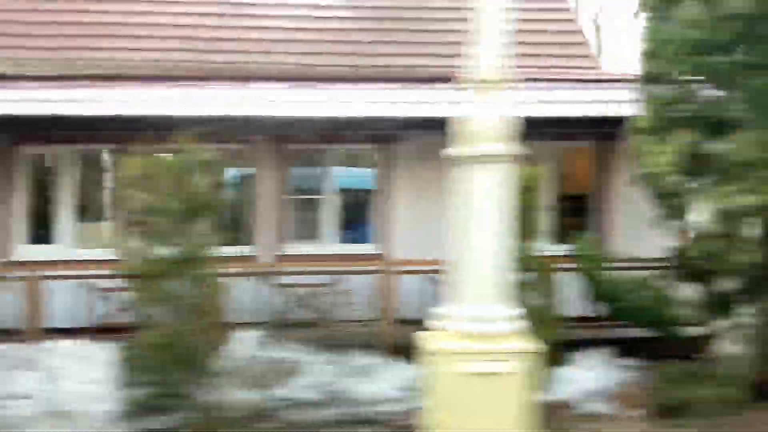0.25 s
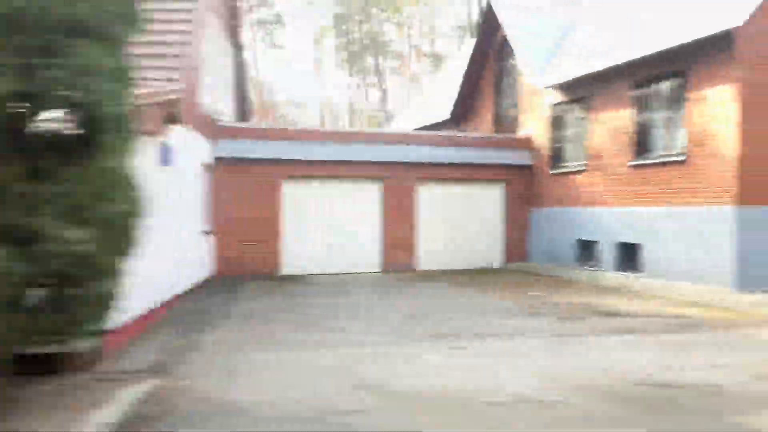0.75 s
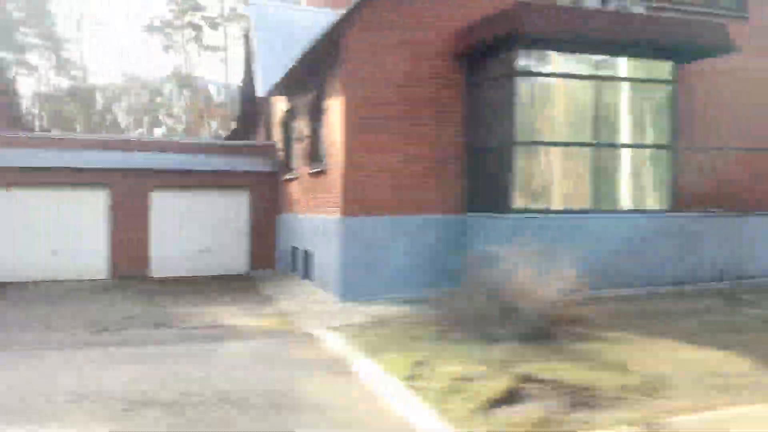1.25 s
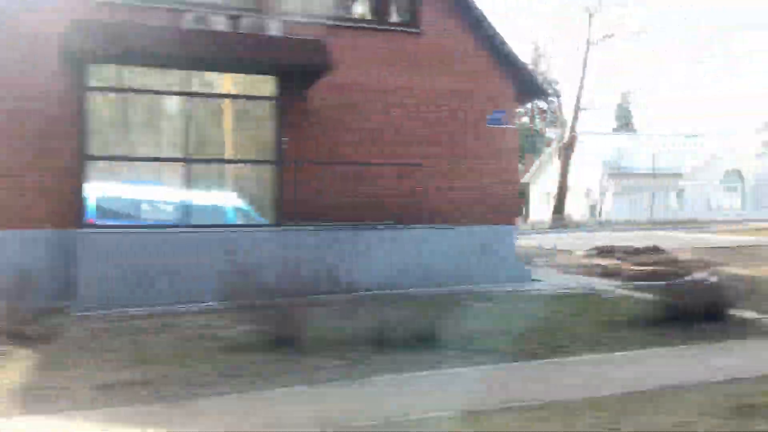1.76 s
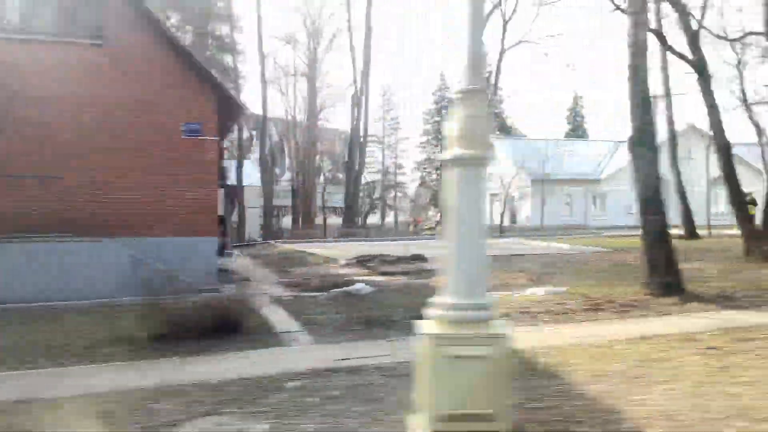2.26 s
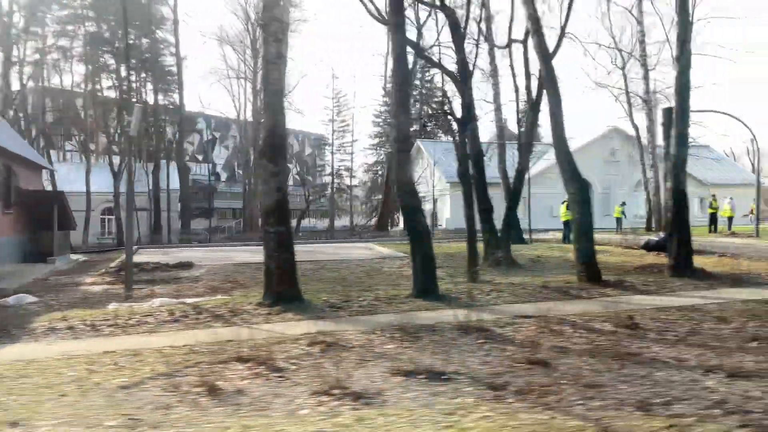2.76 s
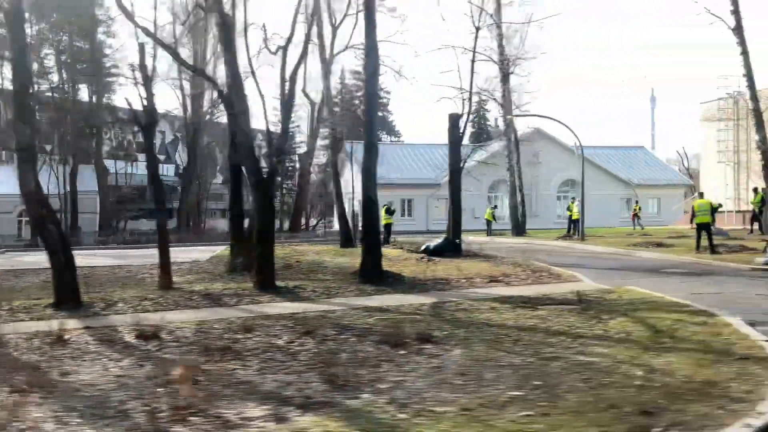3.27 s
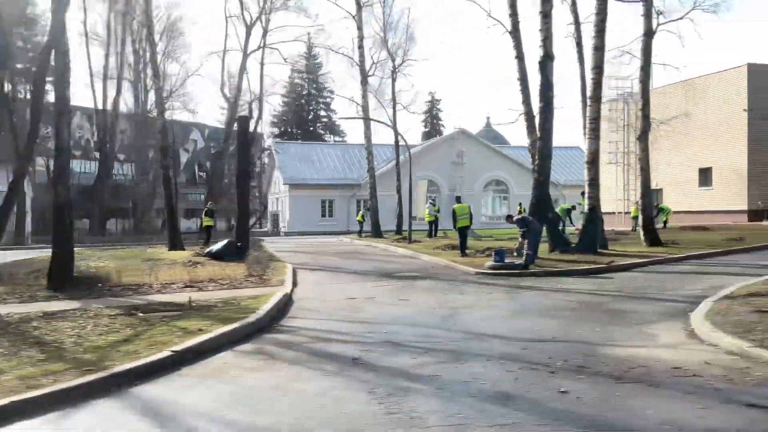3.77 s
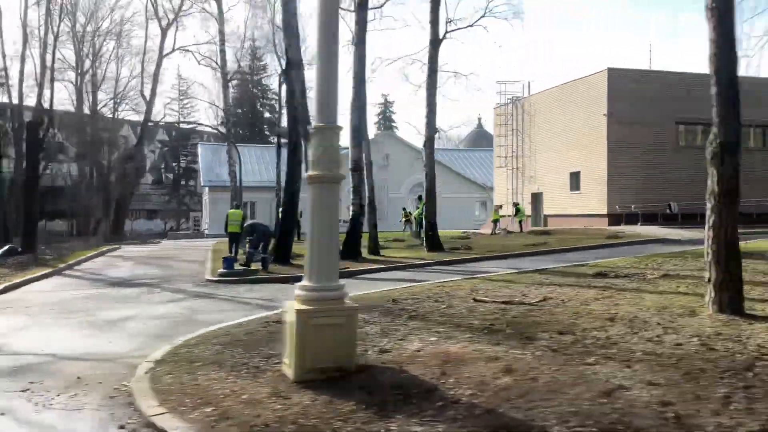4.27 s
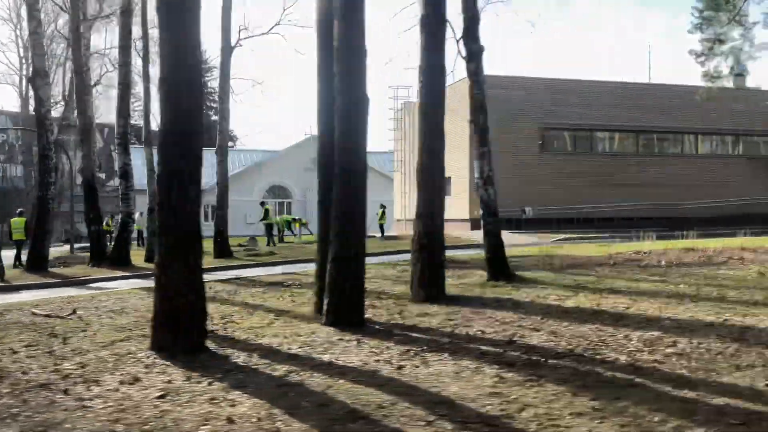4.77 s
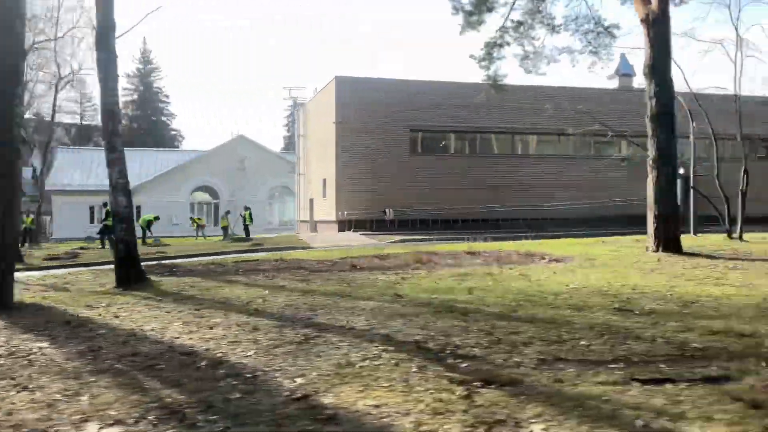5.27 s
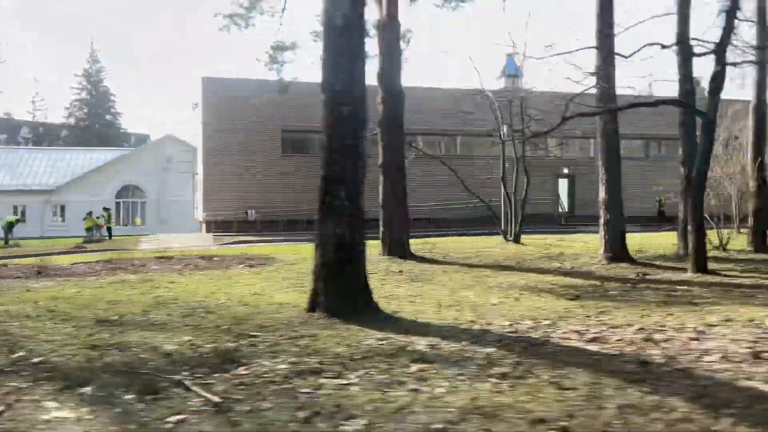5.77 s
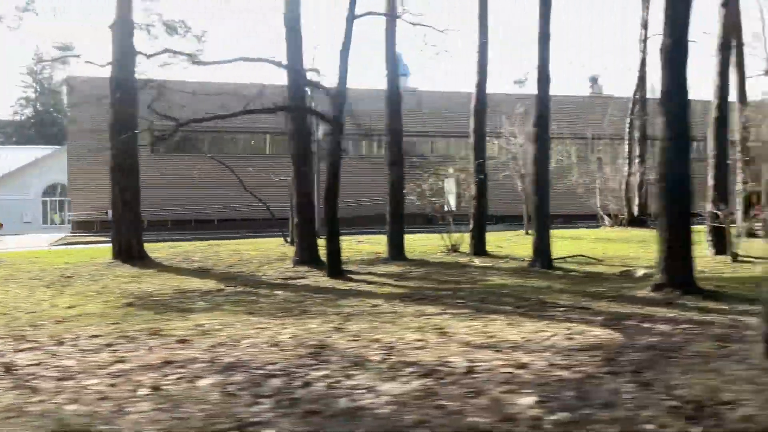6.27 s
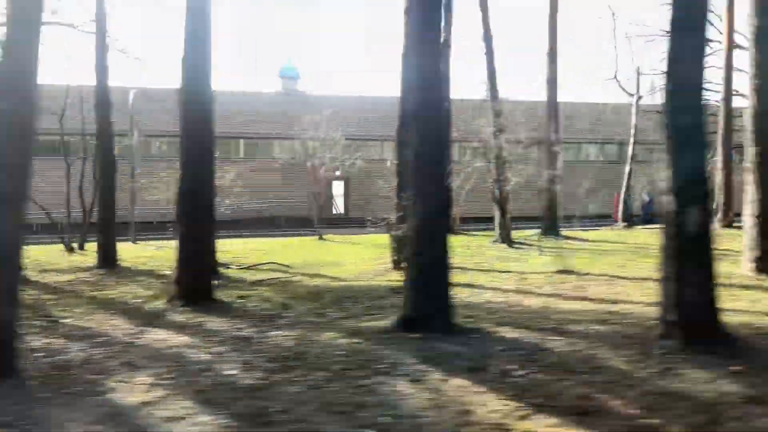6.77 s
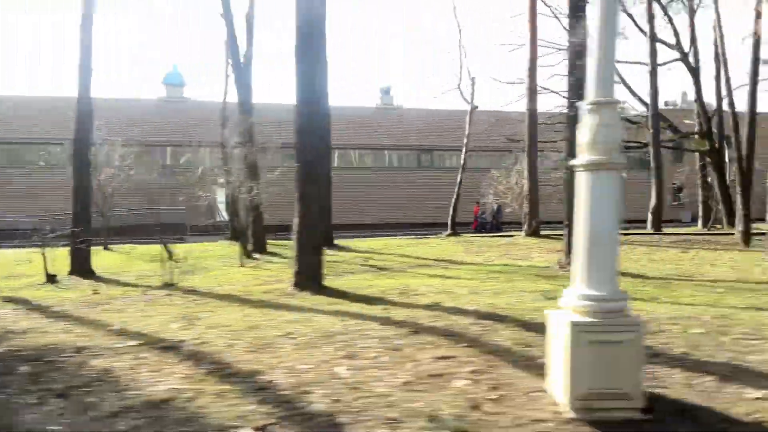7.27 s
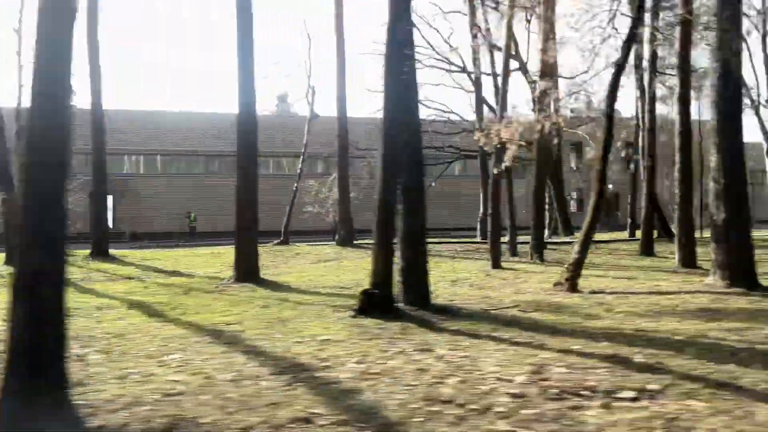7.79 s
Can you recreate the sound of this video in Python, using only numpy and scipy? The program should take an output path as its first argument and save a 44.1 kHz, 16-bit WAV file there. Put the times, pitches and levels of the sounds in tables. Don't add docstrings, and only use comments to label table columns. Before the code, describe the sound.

Heard by a phone near the window inside a slowing bus: a steady low engine drone with gear hum, boomy road rumble and dull panel roar. Light trim ticks and soft bumps come early; past the middle a rough patch brings thuds, rattling and hiss, peaking in one hard panel knock. A tiny metal buzz follows, then the engine eases off into quieter coasting.

```python
import sys
import numpy as np
from scipy import signal
from scipy.io import wavfile

SR = 44100
rng = np.random.default_rng(int(sys.argv[2]) if len(sys.argv) > 2 else 0)


def how_loud(loudness_db):
    steps = np.asarray(loudness_db, float) / 20
    return 10 ** steps


def int16_out(signal):
    q = np.round(np.clip(np.atleast_2d(signal).T, -1, 1) * 32767)
    wavfile.write(sys.argv[1], SR, q.astype(np.int16))


N = 354123
T = np.arange(N) / SR


def curve(table, t):
    s, *columns = np.transpose(table)
    return [np.interp(t, s, c) for c in columns]


def walk(rate, t, count=1):
    knots = rng.standard_normal((count, int(t[-1] * 60) + 3))
    place = np.clip(t * rate, 0, knots.shape[1] - 2)
    k = place.astype(int)
    ease = 0.5 - 0.5 * np.cos(np.pi * (place - k))
    return 1.05 * (knots[:, k] * (1 - ease) + knots[:, k + 1] * ease)


def stereo_noise(spectrum, ports, level_db, patchy_db, rate, panels=(), size=2048):
    overlap = size * 3 // 4
    hz, t, (a, b) = signal.stft(rng.standard_normal((2, N)), SR, nperseg=size, noverlap=overlap)
    log = np.log(np.maximum(hz, 1))

    def on_hz(table):
        table_hz, *columns = np.transpose(table)
        return [np.interp(log, np.log(table_hz), c) for c in columns]

    low, high = np.log([spectrum[0][0], spectrum[-1][0]])
    db = on_hz(spectrum)[0] - 60 * (np.maximum(low - log, 0) + np.maximum(log - high, 0))
    for f, width, lift_db in panels:
        db = db + lift_db / (1 + (2 * (hz - f) / width) ** 2)

    band = np.clip((log - np.log(20)) * 3 / np.log(2), 0, 31).astype(int)
    flicker_db = patchy_db * walk(rate, t, count=32)[band]
    grid_db = db[:, None] + np.interp(t, T, level_db) + flicker_db

    like, lead, pan_db = (c[:, None] for c in on_hz(ports))
    like = np.clip(like, 0, 1)
    right = like * np.exp(1j * lead) * a + np.sqrt(1 - like ** 2) * b
    pair = np.array([a * how_loud(pan_db / 2), right * how_loud(-pan_db / 2)])
    pair = pair * how_loud(grid_db) * np.sqrt(SR / 2)
    return signal.istft(pair, SR, nperseg=size, noverlap=overlap)[1][:, :N]


def ring(drive, hz, t60, lead=0.):
    pole = np.exp(2j * np.pi * hz / SR - np.log(1000) / (t60 * SR))
    z = signal.lfilter([1], [1, -pole], drive)
    return np.array([z.imag, (z * np.exp(1j * lead)).imag])


def band_pass(x, lo_hz, hi_hz):
    return signal.sosfilt(signal.butter(2, [lo_hz, hi_hz], "band", fs=SR, output="sos"), x)


def burst(chance, lo_hz, hi_hz, decay_s):
    puff = chance * np.exp(-T[:chance.shape[-1]] / max(decay_s, 1e-4))
    return band_pass(puff, lo_hz, hi_hz)


def add(out, s, sound):
    i = int(s * SR)
    out[:, i:i + sound.shape[1]] += sound[:, :N - i]


def drivetrain():
    # shaft_multiple, left_db, right_db, right_lead_rad
    engine_hum = [(2.022, -40, -41, 0.5), (3.06, -43.5, -48.5, -1.5), (6.974, -38.5, -55, 0),
                  (12.04, -43, -54, -1), (22.6, -62, -53.5, -3), (24.4, -58, -55, -2.5),
                  (25.8, -62.5, -59, -6), (29.4, -61.5, -58.5, -6)]
    # shaft_multiple, left_minus_right_db, right_lead_rad, right_pulling_db, right_coasting_db
    load_lines = [(3.983, 2, 1.1, -27, -39), (5.965, -5, .5, -32, -44.5), (15.99, -8, -1.76, -43, -56),
                  (7.977, 3.5, 2.0, -41.5, -37), (10.995, -4, -1, -27.5, -35.5),
                  (32.96, -10.5, -2.5, -65, -38.5)]
    # time_s, slack (0 pulling - 1 coasting)
    drive_slack = [(0, 0.34), (1.6, 0.016), (2.5, 0.13), (3.3, 0.47), (4.0, .4), (4.8, 0.27), (5.3, 0.45),
                   (5.55, 0.44), (6.1, 0.54), (7.2, 0.91), (8.03, 1.46)]
    shaft_hz, slowing_hz_per_s = 24.895, 0.226
    whine_full_slack = 0.53

    turns = np.cumsum(shaft_hz - slowing_hz_per_s * T) / SR
    t = T[::64]
    slack = curve(drive_slack, t)[0]
    whine_load = np.clip(slack / whine_full_slack, 0, 1) ** 2
    loads = [slack] * (len(load_lines) - 1) + [whine_load]

    lines = list(engine_hum)
    for (k, pan_db, lead, pull_db, coast_db), load in zip(load_lines, loads):
        db = pull_db + (coast_db - pull_db) * load
        lines.append((k, db + pan_db, db, lead))

    out = np.zeros((2, N))
    for k, left_db, right_db, lead in lines:
        swell, left, right, slip = walk(3.5, t, count=4)
        phase = 2 * np.pi * (k * turns + rng.random()) + np.interp(T, t, 0.39 * slip)
        left_amp = how_loud(left_db + 1.3 * swell + 1.5 * left)
        right_amp = how_loud(right_db + 1.2 * swell + 0.86 * right)
        out[0] += np.interp(T, t, left_amp) * np.sin(phase)
        out[1] += np.interp(T, t, right_amp) * np.sin(phase + lead)
    return np.sqrt(2) * out


def road_boom():
    # freq_hz, density_db_per_hz
    boom_colour = [(20, -71.5), (30, -49.5), (45, -48), (62, -41), (78, -44.5), (95, -40), (125, -46.5),
                   (160, -51.5), (230, -55.5), (290, -51.5), (330, -75.5), (400, -61)]
    # freq_hz, likeness (0-1), right_lead_rad, left_minus_right_db
    boom_ports = [(25, 1, 2.5, 0.5), (50, 0.8, 0, -5), (110, 0.56, -0.37, 1), (164, .62, 0.07, 2.5),
                  (236, 0.3, -1.7, -10.5), (298, .3, .5, -2), (440, .45, 4, -9)]
    # time_s, boom_db
    roughness = [(0, -20.5), (.25, -27.5), (.55, -23.5), (1.0, -22), (1.3, -22.5), (1.6, -25.5),
                 (2.3, -25.5), (2.7, -26), (3.7, -26.5), (4.2, -24.5), (4.7, -21.5), (5.0, -23),
                 (5.4, -18.5), (5.55, -23), (5.7, -27.5), (6.1, -27), (6.5, -30), (8.03, -27)]
    return stereo_noise(boom_colour, boom_ports, curve(roughness, T)[0] + 23, patchy_db=2.0, rate=3.02)


def panel_roar(shake_db):
    # freq_hz, density_db_per_hz
    roar_colour = [(300, -59), (380, -64), (520, -60.5), (700, -62), (780, -62), (860, -68.5),
                   (1000, -76.5), (1250, -78), (1900, -77), (2000, -82), (2900, -81.5), (3600, -90),
                   (4200, -94), (4800, -99)]
    # freq_hz, width_hz, lift_db
    panel_modes = [(434.3, 9.5, 11), (588, 11, 5), (679, 15, 7.5), (803, 11, 5), (1288, 31, 3.5),
                   (1618, 370, 5.5), (1594, 40, 3), (2197, 29, 5.5), (3057, 80, 6.5), (3462, 115, 11.5),
                   (3756, 120, 10), (4060, 90, 4)]
    # freq_hz, likeness (0-1), right_lead_rad, left_minus_right_db
    roar_ports = [(310, 0.53, 2.3, -6.5), (417, 0.28, 3.1, -6.5), (610, 0.79, 3.25, -7),
                  (778, 0.89, 3.6, -6.5), (923, 0.69, 3.0, -0.5), (1090, 0.22, 4.34, 0),
                  (1570, 0.74, 5.16, -7), (1790, 0.45, 5.2, -5.5), (2100, 0.1, 6.2, 1),
                  (2780, 0.25, 9.8, -4), (3190, 0.76, 10.9, 1.5), (3530, 0.59, 12.1, -6),
                  (3750, 0.68, 12.8, 1), (4330, 0.25, 12.5, -4)]
    # time_s, lasts_s, level_db, above_hz
    lull = (5, .5, -6, 2300)

    level_db = -1 - 0.3372 * T + 0.085 * shake_db
    roar = stereo_noise(roar_colour, roar_ports, level_db, patchy_db=0.73, rate=6.0,
                        panels=panel_modes, size=4096)
    s, lasts_s, db, hz = lull
    upper = signal.sosfiltfilt(signal.butter(1, hz, "high", fs=SR, output="sos"), roar)
    dip_db = db * np.exp(-((T - s) / lasts_s) ** 2)
    return roar + upper * (how_loud(dip_db) - 1)


def bumps():
    # time_s, peak_db, pitch_hz, cycles, left_minus_right_db
    wheel_bumps = [(1.058, -13, 90, 1.3, -9), (1.28, -12, 97.5, 5.6, -7), (1.439, -9.5, 96, 1.1, 1),
                   (4.93, -19.5, 45, 6, 1), (5.15, -16.5, 66, 6, -0.5), (4.831, -10, 97, 3.6, -5),
                   (4.88, -12.5, 92.8, 4, 1), (5.405, -15.5, 184.5, 5.5, 0), (5.449, -8, 84.6, 1.7, 4),
                   (5.497, -8, 80, 1.44, -2.5), (5.553, -28, 99, 1.6, 14), (6.079, -23, 90, 1.8, 4.5),
                   (7.179, -19.5, 91.5, 4.4, 3)]
    # time_s, peak_db, pitch_hz, cycles, left_minus_right_db
    seat_thud = (5.5, -23, 280, 2.6, 11)

    out = np.zeros((2, N))
    t = T[:SR // 5] - T[SR // 10]
    for s, db, hz, cycles, pan_db in [*wheel_bumps, seat_thud]:
        swing = np.exp(-(2 * hz * t / cycles) ** 2) * np.cos(2 * np.pi * hz * t)
        sides_db = db + np.array([[pan_db], [-pan_db]]) / 2
        add(out, s + t[0], how_loud(sides_db) * swing)
    return out


def panel_knock():
    # freq_hz, level_db, t60_s, right_lead_rad
    knock_modes = [(408, -8, .12, -2), (493, -1.5, 0.19, 5.5), (644, -10.5, 0.18, 3),
                   (836, -11.5, 0.12, 5.5), (1086, -15.5, 0.065, 3), (1454, -15.5, 0.14, 1),
                   (1890, -11.5, 0.055, 0.5), (2110, -13.5, 0.049, 1.5), (2541, -17, 0.026, -7.5)]
    knock_s, knock_db, crack_db, thump_db = 5.327, -22.5, -31.5, -30.5

    out, t = np.zeros((2, N)), T[:SR // 2]
    blow = rng.standard_normal(len(t)) * np.exp(-t / 0.011)
    modes = sum(how_loud(db) * ring(blow / 16, hz, t60, lead) for hz, db, t60, lead in knock_modes)
    add(out, knock_s, how_loud(knock_db) * modes)

    chance = rng.standard_normal((3, 3, len(t)))
    snap, body, tail = chance[:, :1] + 0.49 * chance[:, 1:]
    crack = 0.37 * burst(snap, 4000, 11500, 0.0012)
    crack = crack + 1.5 * burst(body, 980, 3600, 0.0098)
    crack = crack + 0.2 * burst(tail, 4300, 7000, 0.026)
    add(out, knock_s, how_loud(crack_db) * crack)

    thump_noise = body[::-1, ::-1] * [[1], [-0.5]]
    add(out, knock_s, how_loud(thump_db) * burst(thump_noise, 350, 1600, 0.03))
    return out


def metal_buzz():
    # freq_hz, level_db, t60_s
    metal_modes = [(4360, -1, 0.033), (4480, 5, .025), (5300, -2, .02), (6272, 0, 0.054), (6960, -2, .05),
                   (11400, -2, 0.066), (15160, -16, .03)]
    buzz_s, taps_per_s, buzz_db = 6.342, 93, -53.5

    out, taps = np.zeros((2, N)), np.zeros(SR // 2)
    chance = rng.standard_normal((5, 2))
    tap_s = np.abs(np.arange(5) + 0.1 * chance[:, 0]) / taps_per_s
    taps[(SR * tap_s).astype(int)] = how_loud(2.5 * chance[:, 1])
    modes = sum(how_loud(db) * ring(taps, hz, t60, hz / 5500) for hz, db, t60 in metal_modes)
    add(out, buzz_s, how_loud(buzz_db) * modes)
    return out


def trim_ticks():
    # start_s, peak_db, ring_hz, decay_s
    ticks = [(0.0932, -50.5, 5280, 0.03), (0.632, -51, 7500, 0.03), (0.8006, -51.5, 4890, 0.027),
             (0.9546, -42.5, 5400, 0.019), (2.3216, -56, 9440, 0.03), (3.2494, -51, 5590, 0.026),
             (4.0926, -49.5, 5450, 0.025), (4.144, -43, 5200, 0.026), (4.2967, -50, 5750, 0.03),
             (4.4738, -45, 4960, 0.034), (4.8282, -43, 5700, 0.027), (4.895, -50, 5100, .03),
             (5.374, -43, 5000, .03), (5.43, -45, 4300, .04), (4.995, -44, 6370, 0.028),
             (5.055, -48.5, 6970, 0.026), (5.1762, -45, 5500, 0.033), (5.4874, -45.5, 5810, 0.03),
             (5.5214, -38, 5570, 0.036), (5.7336, -53, 5280, 0.03), (7.2442, -49, 6590, 0.022),
             (7.5076, -46.5, 6640, 0.026)]
    out = np.zeros((2, N))
    for s, db, hz, decay_s in ticks:
        chance = rng.standard_normal((3, 2048))
        noise = chance[0] + 0.5 * chance[1:]
        add(out, s, how_loud(db + 4.0) * burst(noise, 0.77 * hz, 1.14 * hz, decay_s / 16))
    return out


def shaking():
    # time_s, hiss_lift_db, fall_s
    jolts = [(0.04, 6.5, .14), (.63, 9.5, 0.065), (.92, 5, 0.092), (1.16, 9.5, .2), (1.63, 12, .12),
             (2.18, 3.5, .04), (2.325, 7, 0.024), (3.25, 7.5, .06), (3.52, 5, 0.044), (3.8, 7, .12),
             (4.3, 7, .12), (4.47, 12, 0.13), (4.76, 16, .12), (4.96, 13.5, .1), (5.04, 15.5, .14),
             (5.24, 22, 0.09), (5.325, 25.5, 0.12), (5.42, 22, 0.11), (5.55, 11, 0.058),
             (5.74, 13.5, 0.094), (5.98, 16.5, .05), (6.16, 16, .05), (6.355, 17.5, .04), (6.55, 9, .04),
             (6.78, 10, 0.16), (7.08, 13.5, .06), (7.25, 9, .025), (7.51, 16, 0.036), (7.685, 7.5, .025),
             (7.87, 9, 0.05)]
    rise_s = 0.032
    t, power = T[::64], 1
    for s, db, fall_s in jolts:
        slope_s = np.where(t < s, rise_s, fall_s)
        power = power + how_loud(2 * db) * np.exp(-np.abs(t - s) / slope_s * 2)
    return np.interp(T, t, 10 * np.log10(power))


def chatter(shake_db):
    hit, size = rng.random((2, N))
    clicks_per_s = 12 * how_loud(1.2 * shake_db)
    click_db = -54.5 + 0.29 * shake_db - 11 * size
    clicks = (hit < clicks_per_s / SR) * how_loud(click_db)
    noise = rng.standard_normal((3, N))
    noise = noise[0] + 0.6 * noise[1:]

    def smear(decay_s):
        return noise * signal.lfilter([1], [1, -np.exp(-1 / (decay_s * SR))], clicks)

    trim, seats = smear(0.0017), smear(0.01)
    low_seats = how_loud(15) * band_pass(seats, 950, 1500)
    high_seats = how_loud(-3) * band_pass(seats, 2100, 3200)
    return band_pass(trim, 5000, 7600) + low_seats + high_seats


def trim_hiss(shake_db):
    # freq_hz, density_db_per_hz
    rustle_colour = [(3800, -104), (4500, -100), (5500, -101), (6400, -99), (7000, -104), (8000, -109),
                     (9500, -116), (10500, -124)]
    air_colour = [(7000, -122), (8500, -116), (9500, -116), (11000, -121), (13000, -129), (14600, -137)]
    # freq_hz, likeness (0-1), right_lead_rad, left_minus_right_db
    treble_ports = [(3900, 0.78, 0.042, 0.5), (4270, 0.42, -.2, 2), (4800, 0.15, .3, 1),
                    (5300, 0.71, .3, 1.5), (6700, 0.62, 0, -11.5), (7600, 0.79, .1, 5),
                    (8700, 0.64, .5, -5), (12000, 0.3, 0, 2.5)]
    rustle = stereo_noise(rustle_colour, treble_ports, -2 + 0.34 * shake_db, patchy_db=1.0, rate=12.0, size=512)
    air = stereo_noise(air_colour, treble_ports, -8 + shake_db, patchy_db=1.5, rate=13.0, size=512)
    return rustle + air


def microphone_hiss():
    # freq_hz, density_db_per_hz
    hiss_colour = [(9000, -136), (11000, -133), (13000, -130), (14500, -131), (14900, -146)]
    # freq_hz, likeness (0-1), right_lead_rad, left_minus_right_db
    hiss_ports = [(9000, .9, 0, 0), (11000, .98, 0, 0)]
    return stereo_noise(hiss_colour, hiss_ports, 0 * T, patchy_db=-2.2, rate=4.0)


def scene():
    shake_db = shaking()
    cabin = road_boom() + panel_roar(shake_db) + trim_hiss(shake_db)
    rattles = panel_knock() + metal_buzz() + trim_ticks() + chatter(shake_db)
    return drivetrain() + cabin + bumps() + rattles


def band_limit(x):
    return signal.sosfilt(signal.butter(12, 15570, fs=SR, output="sos"), x)


def record(dry):
    return band_limit(dry + microphone_hiss())


dry = scene()
out = record(dry)
int16_out(out)
```